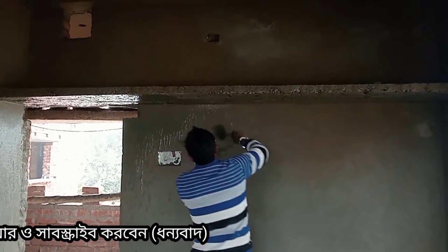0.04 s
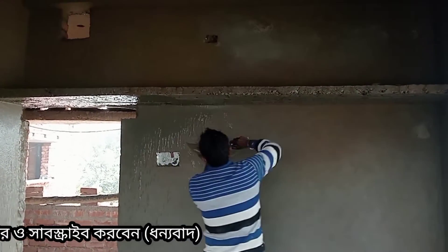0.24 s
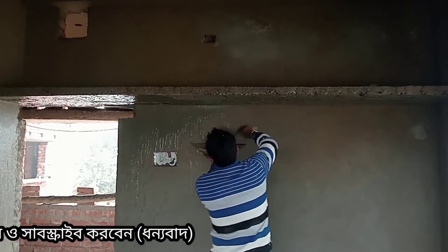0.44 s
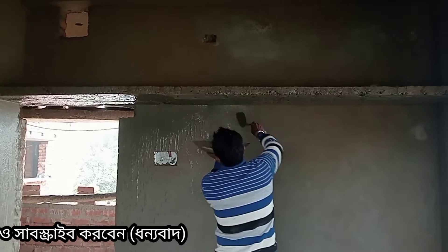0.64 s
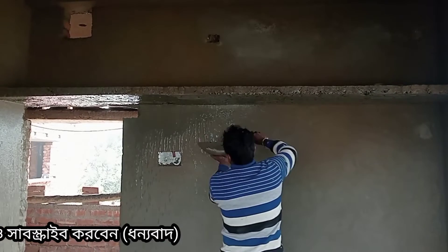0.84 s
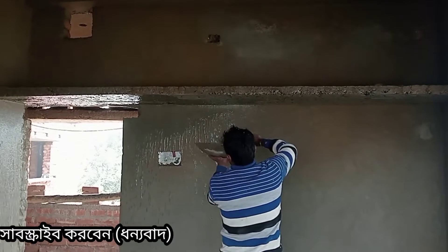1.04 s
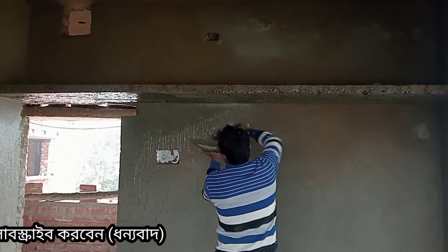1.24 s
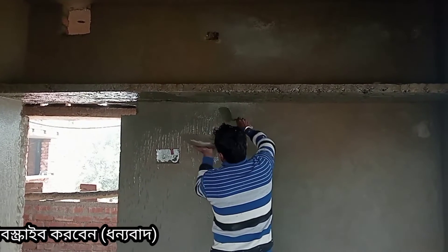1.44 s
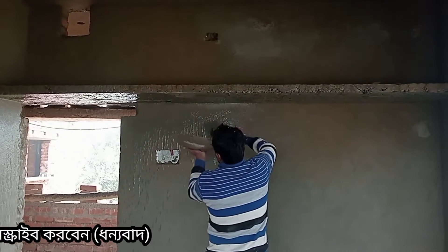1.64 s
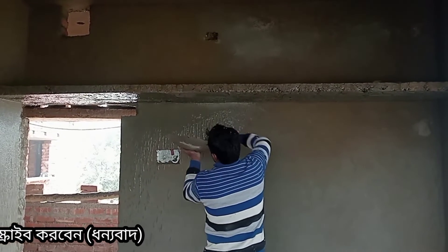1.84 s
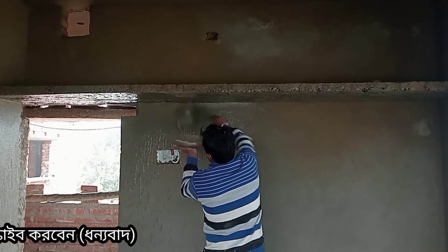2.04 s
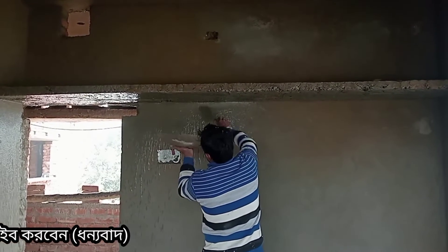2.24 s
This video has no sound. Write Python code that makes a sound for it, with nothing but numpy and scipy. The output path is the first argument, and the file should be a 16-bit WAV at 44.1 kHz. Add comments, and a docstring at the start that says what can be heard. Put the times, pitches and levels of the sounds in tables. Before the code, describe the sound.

A trowel scoops and throws wet mortar, three sharp slaps echoing in a bare room.

```python
"""A steel trowel scrapes wet mortar off a hand board, then the lump hits the wall with a sharp slap and a
short spatter. A plasterer makes three such throws in a bare, echoing masonry room, heard at one microphone.
Sand grinding under the blade sets board and steel ringing; between throws the edge ticks and slides in
the grit. Farther off, faint birds and outdoor noise come through the open doorway."""
import sys
import numpy as np
from scipy import signal
from scipy.fft import rfft, irfft
from scipy.io import wavfile
from scipy.ndimage import uniform_filter1d

SR = 44100
rng = np.random.default_rng(int(sys.argv[2]) if len(sys.argv) > 2 else 0)


def dump(signal):
    """Clip the signal to [-1, 1] and save it as 16-bit WAV at the path in sys.argv[1]."""
    limited = np.clip(np.atleast_2d(signal).T, -1, 1)
    pcm = np.round(limited * 32767).astype(np.int16)
    wavfile.write(sys.argv[1], SR, pcm)


N = 105840
T = np.arange(N) / SR
FFT_SIZE = 8192
HZ = np.maximum(np.arange(FFT_SIZE // 2 + 1) * SR / FFT_SIZE, 1)


def from_db(db):
    """Decibels to gain."""
    return 10 ** (np.asarray(db) / 20)


def unit(x):
    """Scale to an energy of one."""
    return x / np.sqrt(np.sum(x ** 2) + 1e-20)


def colour(points):
    """Spread rows of Hz and dB over the spectrum, on a log-frequency axis."""
    hz, db = np.transpose(points)
    return np.interp(np.log(HZ), np.log(hz), db)


def hump(hz, octaves):
    """A broad resonance of height one."""
    return np.exp(-.5 * (np.log2(HZ / hz) / octaves) ** 2)


def ripple(depth_db=3.0, bins=16):
    """Dense, narrow resonances of the blade, in dB, which change with every grip and load."""
    bumps = rng.standard_normal(len(HZ))
    bumps = uniform_filter1d(uniform_filter1d(bumps, bins), bins)
    above_blade_mode = HZ ** 2 / (HZ ** 2 + BLADE_MODES[0][0] ** 2)
    return depth_db * bumps / bumps.std() * above_blade_mode


def body(curve_db):
    """Causal impulse response of unit energy with the given colour."""
    cepstrum = irfft(np.log(from_db(curve_db)))
    cepstrum[1:FFT_SIZE // 2] *= 2
    cepstrum[FFT_SIZE // 2 + 1:] = 0
    return unit(irfft(np.exp(rfft(cepstrum))))


def through(x, response):
    """Play x through an impulse response."""
    return signal.fftconvolve(x, response)[:N]


def grains(per_s, spread_db=3.5):
    """Random clicks of uneven size; rms 1."""
    sizes = from_db(spread_db * np.minimum(rng.exponential(1, N), 3)) * rng.choice([-1, 1], N)
    return unit(sizes * (rng.random(N) < per_s / SR)) * np.sqrt(N)


def impact(start_s, decay_s=0.00067):
    """A first contact and a dying spray of grains, about equal in energy."""
    clicks = unit(grains(per_s=5000) * np.exp(-T / decay_s))
    clicks[0] += 1
    start = int(start_s * SR)
    return np.roll(unit(clicks), start) * (np.arange(N) >= start) * (start >= 0)


# Surfaces near the work. Each row: delay after the direct sound in seconds, level in dB.
NEAR_SURFACES = [(.0058, -15.5), (.0160, -15)]

def early(clicks, direct_db=-9.5):
    """What reaches the microphone first: the direct sound and the near reflections."""
    echoes = sum(from_db(db) * np.pad(clicks, (int(delay_s * SR), 0))[:N]
                 for delay_s, db in NEAR_SURFACES)
    return from_db(direct_db) * clicks + echoes


# The bare masonry all around. Each row: frequency in Hz, seconds to fall by 60 dB.
ROOM_DECAY = [(100, 1.0), (260, 0.68), (700, 0.71), (1840, 0.56), (4850, 0.56), (9500, 0.47), (14000, 0.49)]

def in_room(clicks, build_s=0.00067):
    """Early sound plus a diffuse tail. Each grain lands on its own spot, so echoes add as energy."""
    white = rfft(rng.standard_normal(N))
    log_hz = np.log(np.maximum(np.arange(len(white)) * SR / N, 1))
    centres = np.log([hz for hz, _ in ROOM_DECAY])
    build = np.exp(-1 / (build_s * SR))
    fed_energy = signal.lfilter([1 - build], [1, -build], clicks ** 2 + 1e-18)
    out = early(clicks)
    for share, (_, t60) in zip(np.eye(len(centres)), ROOM_DECAY):
        band_noise = irfft(white * np.interp(log_hz, centres, share), N)
        retained = from_db(-60 / (t60 * SR)) ** 2
        energy = signal.lfilter([1 - retained], [1, -retained], fed_energy)
        out += band_noise * np.sqrt(energy)
    return out


# The open air beyond the doorway, heard with the microphone's bright peak near 9.7 kHz.
# Each row: frequency in Hz, relative level in dB.
OUTDOORS_AT_MIC = [(25, -38), (45, -26), (60, -5), (80, -10), (115, 6), (170, 0), (300, -3.5), (600, -3.5),
                   (1200, -9.5), (2500, -11), (4500, -11.5), (7000, -18), (9700, -7), (12000, -22),
                   (15500, -32)]

def outdoors(level_db=-50.5):
    """Steady, soft noise from outside."""
    noise = rng.standard_normal(N + FFT_SIZE - 1)
    return from_db(level_db) * signal.fftconvolve(noise, body(colour(OUTDOORS_AT_MIC)), "valid")


# Distant chirps outside, mostly birds. Each row: start and length in seconds, first and last pitch
# in Hz, level in dB, waver as a share of the pitch.
BIRD_CALLS = [(0.0, .08, 1784, 1674, -48.5, .04), (0.084, 0.031, 5620, 5900, -48, 0.028),
              (0.115, 0.024, 5540, 3900, -47, .06), (0.2, .04, 3810, 4500, -44.5, 0.028),
              (0.413, 0.014, 6100, 5200, -48, .05), (1.154, .09, 980, 948, -46, 0.0099),
              (1.524, 0.029, 6150, 5980, -48, 0.0073), (1.557, .04, 5500, 4090, -46.5, .08),
              (1.617, 0.036, 4270, 3930, -45, 0.058), (1.609, 0.16, 1815, 1870, -47, 0.0606)]

def birds():
    """Short gliding whistles with an unsteady pitch."""
    out = np.zeros(N)
    for start_s, length_s, first_hz, last_hz, db, waver in BIRD_CALLS:
        progress = np.clip((T - start_s) / length_s, 0, 1)
        wander = unit(uniform_filter1d(rng.standard_normal(N), size=128)) * np.sqrt(N)
        hz = (first_hz + (last_hz - first_hz) * progress) * (1 + waver * wander)
        swell = np.sqrt(2 * np.abs(np.sin(np.pi * progress)))
        out += from_db(db) * swell * np.sin(2 * np.pi * np.cumsum(hz) / SR)
    return out


# The tone all ticks share, with the microphone's bright peak near 9.7 kHz.
# Each row: frequency in Hz, relative level in dB.
EDGE_AT_MIC = [(100, -47), (800, 1), (1800, 4), (4000, 2.5), (7000, 2.5), (9700, 14), (12000, -5),
               (15500, 0.5)]
# Small touches of the trowel, inside the room. Each row: start in seconds, energy in dB, pitch in Hz.
EDGE_TICKS = [(0.319, -7, 2730), (0.8439, -7.5, 3750), (0.87, -12, 4000), (0.898, -14, 6950),
              (0.91, -15.5, 6140), (0.922, -13, 9100), (0.9700, -12.5, 3000), (1.0756, -1.5, 2040),
              (1.7691, -8.5, 1770), (1.775, -5.5, 10600), (1.891, -16, 12000)]

def ticks(peak_db=15.5):
    """The blade's edge meets sand with a light, bright click."""
    out = np.zeros(N)
    for start_s, db, hz in EDGE_TICKS:
        touch = in_room(impact(start_s))
        edge = body(colour(EDGE_AT_MIC) + peak_db * hump(hz, octaves=0.4) + ripple())
        out += from_db(db) * through(touch, edge)
    return out


# The loaded hand board, heard with the microphone's bright peak near 9.7 kHz.
# Each row: frequency in Hz, relative level in dB.
BOARD_AT_MIC = [(40, -34), (110, -28), (200, -16), (300, -7.5), (430, -8), (650, -6), (830, 0), (1050, -5),
                (1550, 1.5), (2050, -0.5), (2650, 1), (3600, -11.5), (5000, -13.5), (7000, -25.5),
                (9600, -13.5), (12000, -30), (15500, -46)]
# The steel blade. Each row: frequency in Hz, relative level in dB, seconds to fall by 60 dB.
BLADE_MODES = [(1750, -48, 0.16), (1663, 12, 0.037), (1809, -4, 0.14), (2110, 0.5, 0.12), (2158, 0, 0.06),
               (2260, 2, 0.26), (2444, 8.5, 0.03), (2695, -19, 0.15), (3800, -27, .15)]
# Strokes across the board, within reach of the wall. Each row: start in seconds, level in dB, hold and
# release in seconds, then board knock, grit hiss, blade ring and energy of the first bite, all in dB.
TROWEL_STROKES = [(-0.06, -40.5, 0.081, 0.092, 11, 6.5, -31, -12),
                  (0.222, -22.5, 0.016, 0.025, 9.5, -5.5, -34, -1.5),
                  (0.28, -38.5, 0.18, 0.17, 5, 12.5, -4.5, -9),
                  (0.983, -38, 0.027, 0.024, -21, 15.5, -12, -14), (1.064, -20, 0.015, 0.023, 0, 0, -6, -2),
                  (1.7705, -31.5, 0.04, 0.013, 7.5, 2, 7, -2),
                  (2.266, -45, 0.024, 0.047, 16, -2, -28, -14.5)]

def scoops(attack_s=0.0039, knock_hz=304, grit_hz=3640):
    """As the trowel scoops mortar, sand grinds between blade and board and sets both ringing."""
    blade = unit(sum((-1) ** k * from_db(db - 60 * T / t60) * np.sin(2 * np.pi * hz * T)
                     for k, (hz, db, t60) in enumerate(BLADE_MODES)))
    knock = hump(knock_hz, octaves=0.29)
    treble = 1 / (1 + (grit_hz / HZ) ** 4)
    out = np.zeros(N)
    for start_s, db, hold_s, release_s, knock_db, grit_db, ring_db, bite_db in TROWEL_STROKES:
        attack = np.clip((T - start_s) / attack_s, 0, 1)
        release = np.exp(-np.maximum(T - start_s - hold_s, 0) / release_s)
        friction = from_db(db) * attack * release * grains(per_s=1800)
        friction += from_db(bite_db) * impact(start_s)
        board = body(colour(BOARD_AT_MIC) + knock_db * knock + grit_db * treble + ripple())
        out += through(in_room(friction), board)
        out += from_db(ring_db) * through(in_room(friction), blade)
    return out


# Wet mortar on masonry, heard with the microphone's bright peak near 9.7 kHz.
# Each row: frequency in Hz, relative level in dB.
MORTAR_AT_MIC = [(30, -79), (60, -58), (115, -7.5), (180, -11.5), (270, 3), (440, -5), (700, 3),
                 (1100, -1.5), (1600, 1), (3200, 1.5), (4500, 4), (6800, -7.5), (9700, 0), (12000, -12.5),
                 (15500, -23.5)]
# Throws landing on the wall, loudest at the microphone. Each row: start in seconds, energy in dB, thud # in Hz
# and dB, blade clack in Hz and dB, spatter decay in seconds, wall boom in dB, wet spray in dB.
THROWS = [(0.4719, 19.5, 567, 10.5, 2280, 9, 0.023, 5, -1.5),
          (1.2703, 16.5, 1075, 7.5, 1954, 9.5, 0.0017, 2, -1.5),
          (2.0143, 16, 730, 5.5, 1430, 3.5, 0.012, 5.5, 1.5)]

def slaps(crack_hz=6560, crack_db=-7, wall_hz=170, spray_hz=8900):
    """Each lump meets the wall with a crack, traps air with a thud, the trowel blade clacks, and the mortar
    spatters."""
    mortar = colour(MORTAR_AT_MIC)
    low_cut_db = 10 * np.log10(1 + (crack_hz / (HZ + 100)) ** 4)
    crack = body(mortar - low_cut_db)
    out = np.zeros(N)
    for start_s, db, thud_hz, thud_db, clack_hz, clack_db, decay_s, boom_db, spray_db in THROWS:
        thud = thud_db * hump(thud_hz, octaves=0.24)
        clack = clack_db * hump(clack_hz, octaves=0.31)
        boom = boom_db / (1 + (HZ / wall_hz) ** 2)
        spray = spray_db * hump(spray_hz, octaves=1)
        spatter = in_room(impact(start_s, decay_s))
        lump = body(mortar + thud + clack + boom + spray + 0.55 * ripple())
        out += from_db(db) * through(spatter, lump)
        snap = early(impact(start_s, decay_s=0.007))   # the first contact is dry: no room tail
        out += from_db(db + crack_db) * through(snap, crack)
    return out


def scene():
    """From inside the room, in mono: the work and the birds echo over steady outdoor noise."""
    room = in_room(signal.unit_impulse(N))
    return (slaps() + scoops() + ticks() + through(birds(), room) + outdoors())[None]


def record(dry, ceiling=0.85, cutoff_hz=15800):
    """After the microphone, the highest peaks are rounded and the top is cut steeply."""
    rounded = dry / (1 + (dry / ceiling) ** 4) ** .25
    return signal.sosfilt(signal.ellip(10, .2, 90, cutoff_hz, fs=SR, output="sos"), rounded)


dry = scene()
out = record(dry)
dump(out)
```